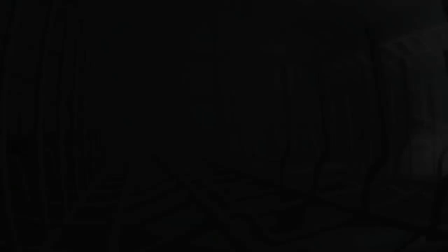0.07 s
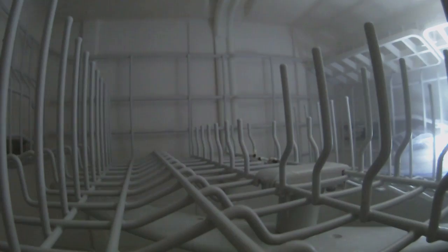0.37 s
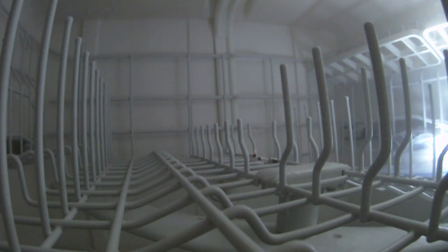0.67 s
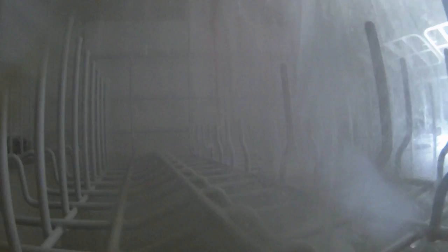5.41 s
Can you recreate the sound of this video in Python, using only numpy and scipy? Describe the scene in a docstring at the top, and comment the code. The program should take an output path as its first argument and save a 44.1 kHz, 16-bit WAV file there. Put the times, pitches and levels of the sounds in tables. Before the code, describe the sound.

Close dripping and bubbling in a dishwasher tub gives way to a loud, pulsing spray of water with hollow thuds.

```python
"""Water trickles, drips and gurgles in the ringing tub of a dishwasher, heard from a waterproof camera
on the rack. Drops splash and trap bubbles, which ring and excite the tub's standing waves. Then the pump
builds pressure and the jets roar over everything, drumming on the walls as the arm turns. The camera's
housing resonates, its lowest note falling as it gets wet, and the spray overdrives its one microphone."""
import sys
import numpy as np
from scipy import signal
from scipy.fft import rfft, irfft, next_fast_len
from scipy.io import wavfile
from scipy.ndimage import uniform_filter1d, map_coordinates

SR = 44100
rng = np.random.default_rng(int(sys.argv[2]) if len(sys.argv) > 2 else 0)


def to_wav(sig):
    """Store sig (one row per channel, or 1-D mono) as 16-bit WAV at the path in sys.argv[1].

    Samples outside -1..1 are clipped; the rate is SR.
    """
    pcm = np.clip(np.atleast_2d(sig), -1, 1) * 32767
    pcm = np.round(pcm).astype(np.int16)
    wavfile.write(sys.argv[1], SR, pcm.T)  # frames by channels


N = 354563
TIME = np.arange(N) / SR
ONSET_S, JETS_S = 0.3195, 3.03  # the sound starts out of silence; the jets reach full pressure

# spectrum of splashing water: (frequency [Hz], level [dB])
SPLASH_SPECTRUM = [(30, -40), (180, -44), (300, -28.5), (450, -24.5), (700, -22), (950, -19), (1200, -21),
                   (2100, -9.5), (3050, -3.5), (4000, -25.5), (5200, -22), (7000, -25), (9500, -31.5),
                   (15000, -30.5)]


def amp(db):
    """Amplitude ratio of a level in decibels."""
    return 10 ** (np.asarray(db) / 20)


def unit(x):
    """Normalisation to an rms of 1."""
    return x / np.sqrt(np.mean(x ** 2) + 1e-20)


def at_peak(x, db):
    """Normalisation to a peak level."""
    return amp(db) * x / np.abs(x).max()


def along(points, hz):
    """Interpolation of (frequency, value) points on a logarithmic axis."""
    frequencies, values = np.transpose(points)
    return np.interp(np.log(hz + 1), np.log(frequencies), values)


def curve(points, t=TIME):
    """Linear interpolation of (time, value) points."""
    return np.interp(t, *np.transpose(points))


def ramp(t, start_s, length_s):
    """A linear rise from 0 to 1."""
    return np.clip((t - start_s) / length_s, 0, 1)


def bell(offset, width):
    """A Gaussian of height 1 whose standard deviation is width."""
    return np.exp(-0.5 * (offset / width) ** 2)


def wobble(rate):
    """Smooth random modulation through rate knots a second."""
    return map_coordinates(rng.standard_normal(int(N * rate / SR) + 4), [TIME * rate])


def filtered(x, response):
    """Linear filtering: the spectrum is multiplied by a frequency response."""
    size = next_fast_len(len(x) + SR // 4)
    return irfft(rfft(x, size) * response(np.fft.rfftfreq(size, 1 / SR)), size)[:len(x)]


def shaped(x, gain_db, size=512):
    """Time-varying filtering: each short-time spectrum takes its own gain."""
    hz, t, spectra = signal.stft(x, SR, nperseg=size)
    return signal.istft(spectra * amp(gain_db(hz[:, None], t)), SR, nperseg=size)[1][:len(x)]


def add(track, s, sound):
    """Superposition of a sound starting at s seconds."""
    part = track[round(s * SR):][:len(sound)]
    part += sound[:len(part)]


def damped(t60, attack):
    """Exponential damping, 60 dB in t60 seconds, with an onset of time constant attack."""
    t = TIME[:SR // 3]
    return amp(-60 * t / t60) * (1 - np.exp(-t / attack))


def patter(rate, spread_db):
    """Shot noise: impacts at random times, with log-normal sizes."""
    size = amp(spread_db * np.clip(rng.standard_normal(N), -3, 2.5)) * rng.choice([-1, 1], N)
    return unit(size * (rng.random(N) < rate / SR))


def ring(hz, t60, rise, attack):
    """A damped oscillator gliding by the fraction rise; a bubble's pitch climbs near the surface."""
    pitch = hz * (1 + rise * (np.minimum(TIME[:SR // 3] / t60, 1) - 1 / 4))
    return unit(np.sin(2 * np.pi * np.cumsum(pitch) / SR) * damped(t60, attack))


def tub(x, wet_db):
    """Reverberation: dense reflections in the small hard box follow the direct sound."""
    # decay of the reflections: (frequency [Hz], reverberation time [s])
    decay_times = [(300, 0.68), (1300, 0.22), (3000, 0.2), (6000, 0.097), (14000, 0.13)]
    tail = shaped(rng.standard_normal(SR // 3), lambda hz, t: -60 * t / along(decay_times, hz), size=256)
    return x + amp(wet_db) * signal.fftconvolve(x, tail / np.linalg.norm(tail))[:len(x)]


def housing_db(hz, film):
    """Resonance of the housing: a clinging water film shifts and damps most of its peaks."""
    # housing modes: (dry frequency [Hz], wet frequency [Hz], width [Hz], dry gain [dB], wet gain [dB])
    resonances = [(2644, 2440, 168, 11, 7), (5170, 5170, 426, 17, 7.5), (6400, 6990, 640, 11.5, 13.5),
                  (11980, 12500, 1100, 15, 9.5), (14800, 14930, 780, 14.5, 10.5)]
    return sum((dry_db + film * (wet_db - dry_db)) * bell(hz - dry_hz - film * (wet_hz - dry_hz), width)
               for dry_hz, wet_hz, width, dry_db, wet_db in resonances)


def standing_waves(x, jets):
    """Normal modes of the tub: how strongly each rings depends on where the source lies."""
    # tub modes: (frequency [Hz], bandwidth [Hz], gain from the sump [dB], gain from the jets [dB])
    modes = [(330, 19, -2, 0.5), (450, 20, 7, -0.5), (539.8, 4.5, 18, 1), (623, 8.5, -2, -3),
             (798, 15.4, 2, 8), (881, 9, 2, 3), (959, 17, 6, -8), (1004, 19, 10.5, 2.5), (1078, 23, 7, 3.5),
             (1184, 16, 1, -18), (1200, 10, -16, -6), (1290, 12, 14, -52), (1319, 32, 15.5, -7),
             (1559, 34, 9.5, -0.5), (1716, 10, -11, -16), (1786, 7, 10.5, -9), (1890, 29, -12, -6),
             (2507, 27, -30, -13)]

    def response(f):
        return 1 + sum(amp(jet_db if jets else sump_db) * 1j * f * width / (hz**2 - f**2 + 1j * f * width)
                       for hz, width, sump_db, jet_db in modes)
    return filtered(x, response)


def trickle(count=200, growth_db_per_s=1.44):
    """Incoherent summation: countless small drops and bubbles merge as they run down walls and racks."""
    # the trickle's tone colour, with a dip that softens its hiss near 5 kHz: (frequency [Hz], gain [dB])
    colour = [(1200, 0.5), (2700, -0.5), (5200, -5), (9000, -0.5), (14000, -2.5)]
    # drops land in little showers that start at once and die away
    shower_decay = amp(-60 * TIME[:SR // 8] / 0.041)
    showers = signal.fftconvolve(np.abs(patter(rate=82, spread_db=2.5)), shower_decay)[:N]
    drops = tub(patter(rate=2500, spread_db=5) * (0.5 + unit(showers)), wet_db=4.5)
    spatter = filtered(drops, lambda f: amp(along(SPLASH_SPECTRUM, f) + housing_db(f, 0) + along(colour, f)))
    bubbles = np.zeros(N)
    for when, pitch, size in rng.random((count, 3)):
        bubble = ring(2000 * 1.6 ** pitch, t60=0.014, rise=0.17, attack=0.00031)
        add(bubbles, when * TIME[-1], amp(-6 * size) * bubble)
    water = standing_waves(unit(spatter) + amp(-5.5) * unit(tub(bubbles, wet_db=-1.5)), jets=False)
    level_db = -23 + growth_db_per_s * (np.minimum(TIME, JETS_S) - ONSET_S) + 0.5 * wobble(6)
    filling_db = -4.5 * (1 - ramp(TIME, ONSET_S, length_s=0.29))
    return amp(level_db + filling_db) * unit(water) * ramp(TIME, ONSET_S, length_s=0.01)


def tinkles(count=520, centre_hz=5320, scatter=0.056, level_db=-33):
    """Bubble resonance: the tiniest bubbles ring highest, near the housing's second mode."""
    out = np.zeros(N)
    for when, pitch, size in zip(rng.random(count), rng.standard_normal(count), rng.random(count)):
        bubble = ring(centre_hz * np.exp(scatter * pitch), t60=0.0089, rise=0.06, attack=0.00046)
        add(out, ONSET_S + when * (TIME[-1] - ONSET_S), amp(-13 * size) * bubble)
    return amp(level_db) * unit(tub(out, wet_db=0.5))


def splash(bright_db):
    """Impact noise: a short broadband burst of spatter, coloured by the housing."""
    treble = [(3000, 0.13), (12000, 0.99)]  # (frequency [Hz], share of bright_db [0-1])
    burst = rng.standard_normal(SR // 3) * damped(t60=0.067, attack=0.00054)

    def response(hz):
        return amp(along(SPLASH_SPECTRUM, hz) + housing_db(hz, film=0) + bright_db * along(treble, hz))
    return unit(filtered(burst, response))


def drips(bubbles_per_drop=3):
    """Air entrainment: a drop traps ringing bubbles; its splash is brighter the more it outweighs them."""
    # drops into the sump: (time [s], relative peak [dB], bubble pitch [Hz], splash over bubble [dB])
    falling_drops = [(.334, -10.5, 1900, -14), (.417, -6, 2570, 9), (.448, -6.5, 2780, 0),
                     (.627, -9, 2570, 17), (.66, -1.5, 2650, 2), (.725, -10, 2830, -7),
                     (0.795, -11.5, 2700, 15), (.868, -1.5, 2370, -2.5), (1.107, -0.5, 2610, -1.5),
                     (1.241, -2, 1850, 2.5), (1.307, 0.5, 2490, -6.5), (1.36, 1.5, 2750, -13),
                     (1.404, -2, 2860, 2), (1.518, -4, 2010, 1), (1.613, 1, 2610, -0.5),
                     (1.693, -5.5, 1760, 2), (1.774, -5.5, 3140, -14), (1.866, -6, 2740, 2),
                     (1.928, -3, 2750, 26), (2.018, -4, 2760, -7.5), (2.162, -8, 2870, -3),
                     (2.239, 9, 2534, -9), (2.265, 1, 2630, -11), (2.34, 0.5, 2690, 7),
                     (2.381, -4.5, 2600, 0), (2.45, -3.5, 2540, -13), (2.548, -4, 2830, -2),
                     (2.641, -7.5, 3240, 0)]
    out = np.zeros(N)
    for s, db, hz, splash_db in falling_drops:
        drop = amp(splash_db) * splash(bright_db=splash_db - 14)
        for k, (detune, lag) in enumerate(rng.random((bubbles_per_drop, 2))):
            # the first bubble sets the pitch; the later ones are weaker and stray from it
            bubble = ring(hz * 1.203 ** (k * (detune - 0.5)), t60=0.0095, rise=0.12, attack=0.0013)
            add(drop, k * 0.0065 * (lag + 0.5), amp(-5 * k) * bubble)
        add(out, s, at_peak(standing_waves(tub(drop, wet_db=2), jets=False), db - 1.5))
    return out


def gulps():
    """Bubble resonance falls with size: large air pockets ring lower and longer."""
    # air gulping through the sump and spray arm: (time [s], relative peak [dB], frequency [Hz])
    air_pockets = [(0.433, -13.5, 1003), (.576, -25, 458), (1.007, -16.5, 1013), (1.059, -12, 868),
                   (1.356, -18, 854), (1.412, -11, 1385), (1.564, -17, 1263), (1.797, -16.5, 1047),
                   (1.999, -12, 1553), (2.134, -20, 887), (2.248, -8, 1337)]
    out = np.zeros(N)
    for s, db, hz in air_pockets:
        bubble = ring(hz, t60=0.07, rise=0.092, attack=0.00055)
        add(out, s, at_peak(tub(bubble, wet_db=-4.5), db - 0.5))
    return out


def pump(hum_hz=210, hum_over_rumble_db=-2):
    """Machine noise: a broadband rumble and the motor's tone swell together as the arms fill."""
    # swell of the rumble: (time [s], level [dB])
    swell = [(2.4, -65.5), (2.88, -46), (2.97, -28.5), (3.08, -45)]
    # spectrum of the rumble: (frequency [Hz], level [dB])
    rumble_spectrum = [(20, -10), (45, -10), (100, -28), (200, -3), (300, -2), (800, -42)]
    rumble = unit(filtered(rng.standard_normal(N), lambda hz: amp(along(rumble_spectrum, hz))))
    pitch = hum_hz * (1 + 0.014 * wobble(20))
    hum = unit(np.sin(2 * np.pi * np.cumsum(pitch) / SR))
    return amp(curve(swell)) * (rumble + amp(hum_over_rumble_db) * hum) * (TIME > ONSET_S)


def drumming(nozzles=2, nozzle_lag_s=0.032, nozzle_drop_db=8.5):
    """Impact excitation: neighbouring jets slap a panel in turn, each a short boom in a rough thud."""
    # the hardest slaps on a wall: (time [s], peak level [dB], panel frequency [Hz])
    slaps = [(2.77, -8, 930), (3.359, 10.5, 762), (3.425, 8, 1195), (4.139, 14, 705), (4.39, 11, 670),
             (4.616, 7, 700), (4.67, 10.5, 700), (5.16, 8.5, 583), (5.618, 9.5, 557), (5.716, 3.5, 537),
             (6.155, 2.5, 670), (6.465, 3.5, 660), (6.598, 10, 612), (7.08, 6, 603), (7.14, 0, 600),
             (7.55, 5.5, 624), (7.765, 3, 927)]
    out = np.zeros(N)
    for s, db, hz in slaps:
        # the thud centres on the panel's note and trails off into spatter: (frequency [Hz], level [dB])
        panel = [(0.16 * hz, -20), (0.71 * hz, -13), (hz, 0), (1.33 * hz, -8), (1.6 * hz, -2),
                 (3.3 * hz, -9), (6 * hz, -20), (12 * hz, -33)]
        boom = ring(hz, t60=0.038, rise=-0.045, attack=0.0077)
        boom += amp(-6) * ring(1.1 * hz, t60=0.055, rise=-0.05, attack=0.005)
        for nozzle in range(nozzles):
            burst = rng.standard_normal(SR // 3) * damped(t60=0.12, attack=0.0016)
            thud = unit(filtered(burst, lambda f: amp(along(panel, f))))
            add(out, s + nozzle * nozzle_lag_s, at_peak(boom + amp(3) * thud, db - nozzle_drop_db * nozzle))
    return out


def pressure_db(spurt_s=2.89, rise_db_per_s=177):
    """Jet noise follows pressure: a spurt of air and water, then full flow, which later eases."""
    spurt_db = -9.5 - rise_db_per_s * np.maximum(spurt_s - TIME, 0)
    full_db = 0.5 - rise_db_per_s * np.maximum(JETS_S - TIME, 0)
    return np.maximum(spurt_db, full_db) - 3.5 * ramp(TIME, start_s=3.97, length_s=0.38)


def sweep(t, pass_s=4.18, period_s=0.482, width_periods=0.15):
    """Periodic modulation: the turning arm aims at the microphone strongly, then weakly, each period."""
    phase = (t - pass_s) / period_s % 1
    strong = bell(np.minimum(phase, 1 - phase), width_periods)
    weak = 0.29 * bell(phase - 0.5, width_periods)
    aim = strong + weak
    # the sweeps stand out once the arm is up to speed
    return (aim - aim.mean()) * ramp(t, JETS_S, pass_s - JETS_S)


def spray():
    """Jet break-up: dense drops hammer tub, racks and housing, and their impacts merge into a roar."""
    # spectrum of the roar: (frequency [Hz], level [dB])
    roar_spectrum = [(30, -23), (130, -35), (260, -8), (430, -8), (650, 0.5), (1000, -1), (1300, 2.5),
                     (1700, 6), (2150, 6), (2850, 3.5), (3300, -5), (4000, -16), (9000, -19.5),
                     (16000, -19.5)]
    # water clinging to the housing: (time [s], wetness [0-1])
    film = [(3, 0.03), (4.4, 0.1), (5.2, 0.44), (7.2, 0.84)]
    # treble of fine mist striking the housing: (time [s], level [dB])
    mist = [(2.99, -19), (3.02, -4), (3.95, 2), (5, -.5), (6.75, 0), (6.85, 4.5), (8.04, 3)]
    # the low part of the roar: (frequency [Hz], weight [0-1])
    body_band = [(1100, 1), (1700, 0)]
    mist_band = [(7500, 0.058), (11000, 0.96)]  # (frequency [Hz], weight [0-1])

    def colour_db(hz, t):
        mist_db = (curve(mist, t) + 0.64 * rng.standard_normal(len(t))) * along(mist_band, hz)
        # the low part fills in as the walls stream with water, and swells with each sweep
        body_db = (2 * sweep(t) - 6.5 * (1 - ramp(t, JETS_S, length_s=0.97))) * along(body_band, hz)
        # each passing jet strikes other surfaces, so the colour comes in patches
        patches = uniform_filter1d(rng.standard_normal((len(hz), len(t))), size=5, axis=0)
        patches_db = 1.68 * unit(uniform_filter1d(patches, size=7, axis=1))
        hiss_db = 4 * bell(t - 6.4, 0.68) * bell(hz - 7000, 450)  # a narrow hiss swells and fades
        base_db = along(roar_spectrum, hz) + housing_db(hz, curve(film, t))
        return base_db + hiss_db + mist_db + body_db + patches_db
    drops = patter(rate=5000, spread_db=5) + 0.74 * rng.standard_normal(N)
    roar = unit(standing_waves(shaped(drops, colour_db), jets=True))
    flutter_db = 0.94 * wobble(60) + 0.24 * wobble(9)
    return amp(pressure_db() + 3 * sweep(TIME) + flutter_db) * roar


def scene():
    """Superposition of all sources at one microphone, the same in both channels."""
    mix = drips() + gulps() + trickle() + spray() + drumming() + pump() + tinkles()
    return np.array([mix, mix])


def record(dry, ceiling=0.71, hardness=9, band_limit_hz=15750):
    """Saturation: the overdriven microphone flattens the peaks; nothing passes above the band limit."""
    clipped = dry / (1 + np.abs(dry / ceiling) ** hardness) ** (1 / hardness)
    return np.array([filtered(channel, lambda hz: hz < band_limit_hz) for channel in clipped])


dry = scene()
out = record(dry)
to_wav(out)
```